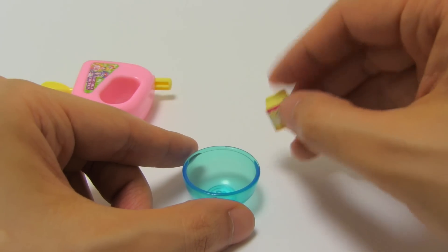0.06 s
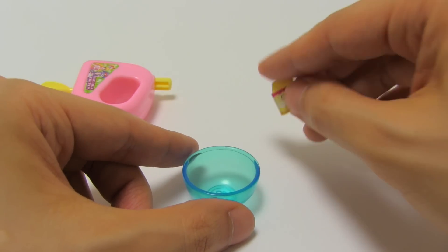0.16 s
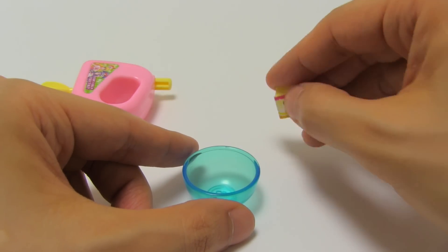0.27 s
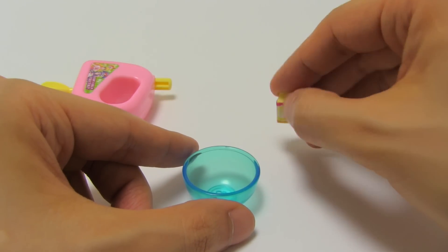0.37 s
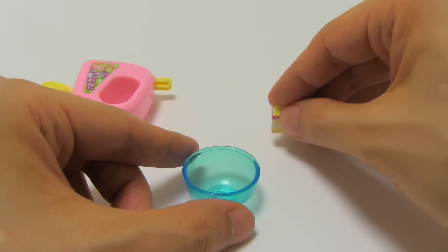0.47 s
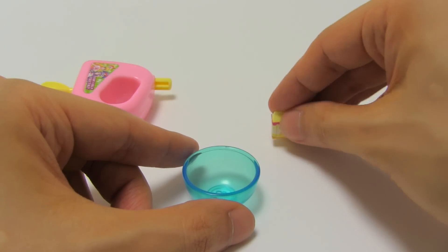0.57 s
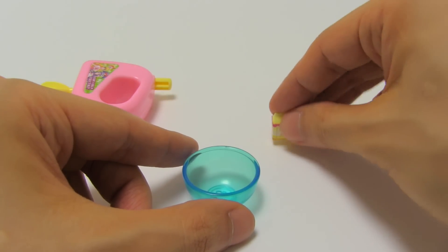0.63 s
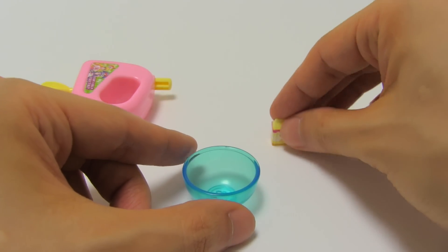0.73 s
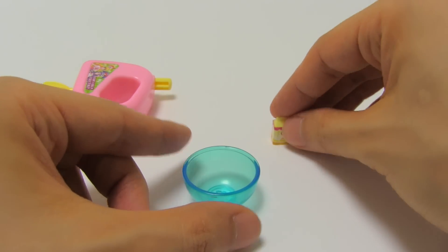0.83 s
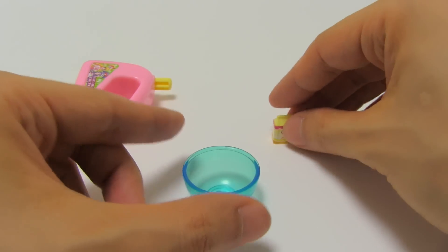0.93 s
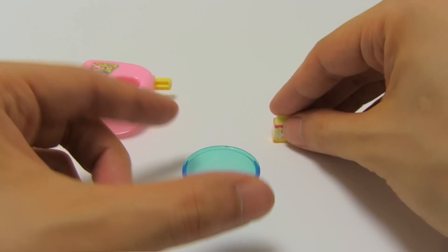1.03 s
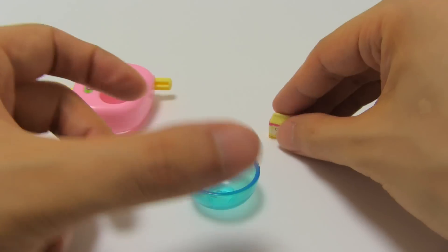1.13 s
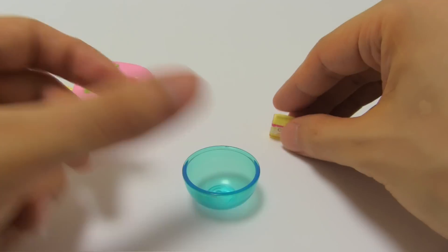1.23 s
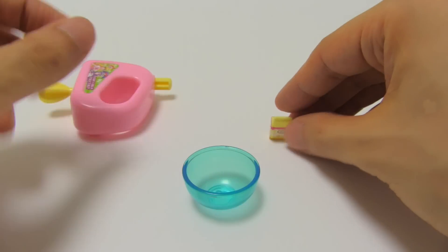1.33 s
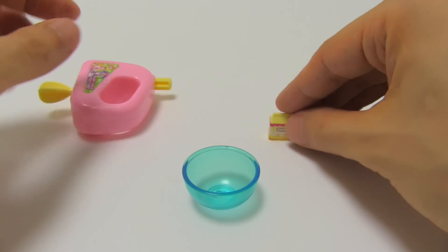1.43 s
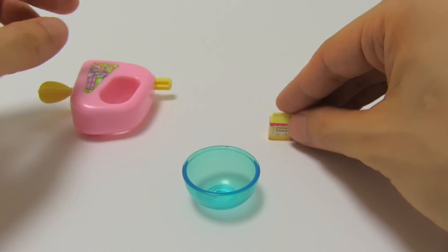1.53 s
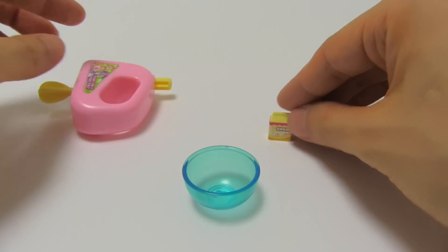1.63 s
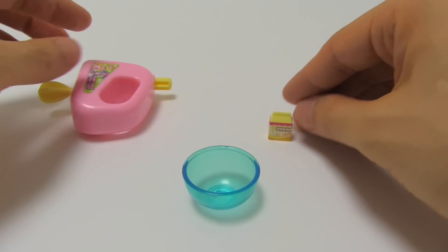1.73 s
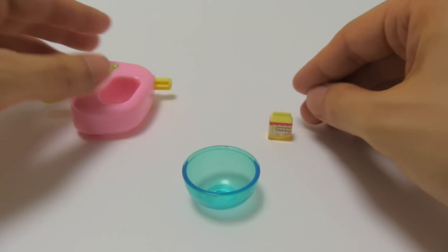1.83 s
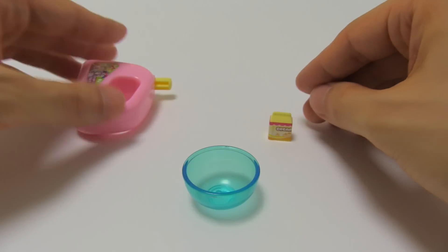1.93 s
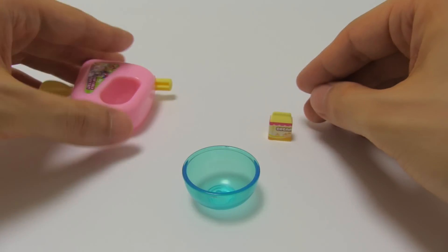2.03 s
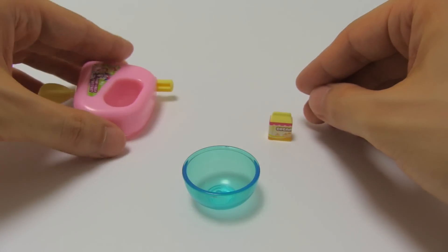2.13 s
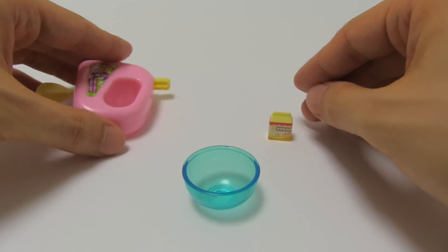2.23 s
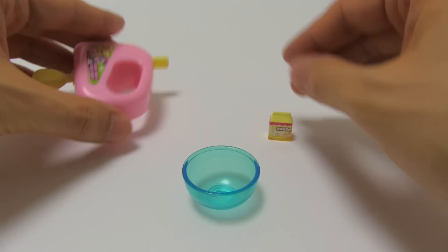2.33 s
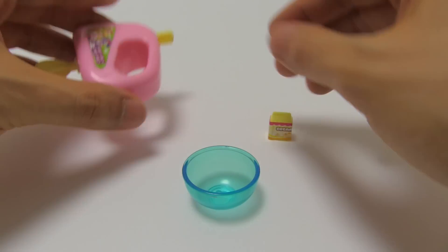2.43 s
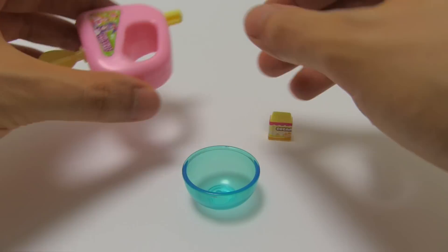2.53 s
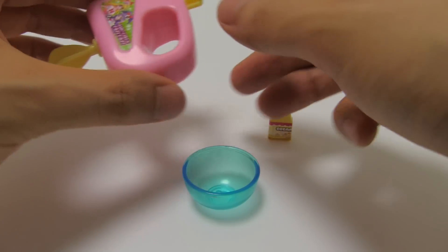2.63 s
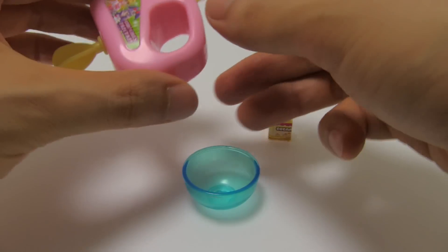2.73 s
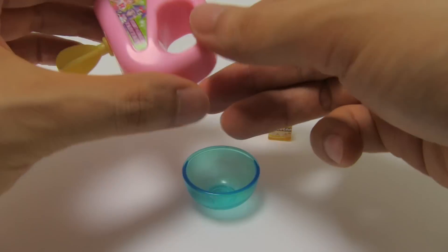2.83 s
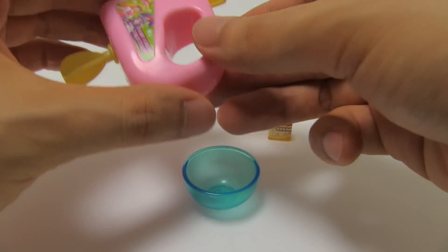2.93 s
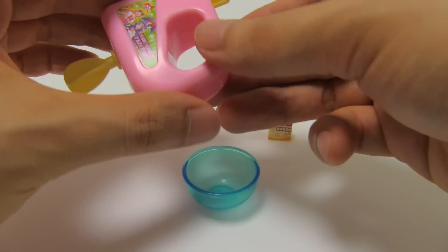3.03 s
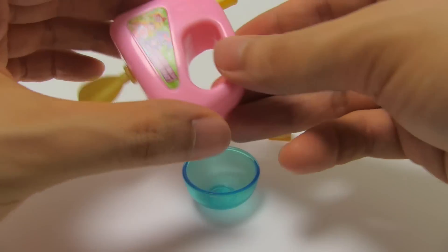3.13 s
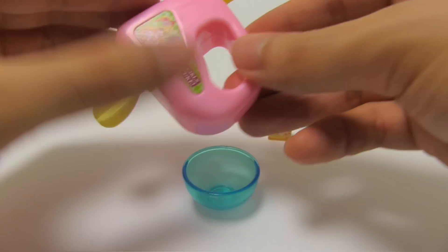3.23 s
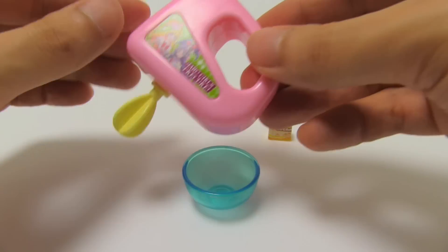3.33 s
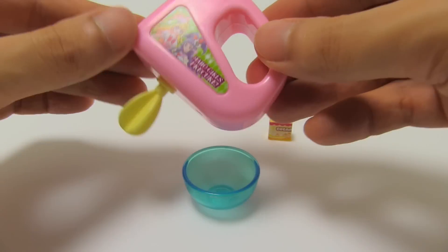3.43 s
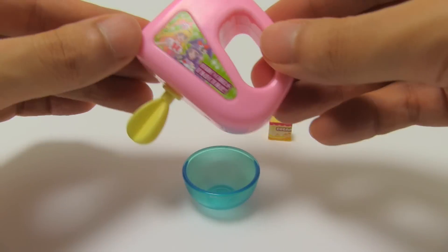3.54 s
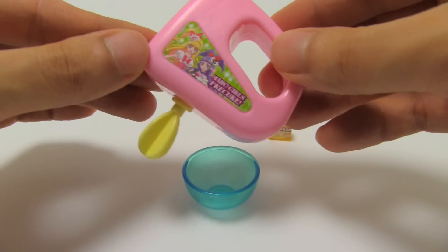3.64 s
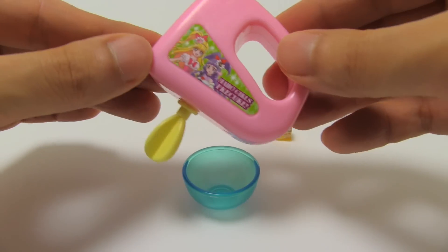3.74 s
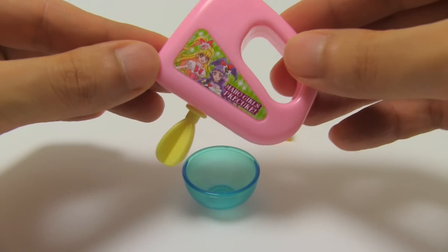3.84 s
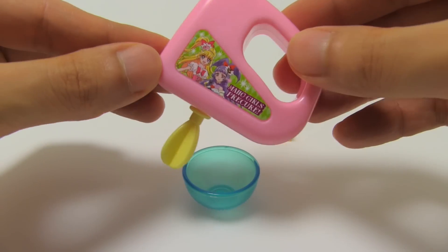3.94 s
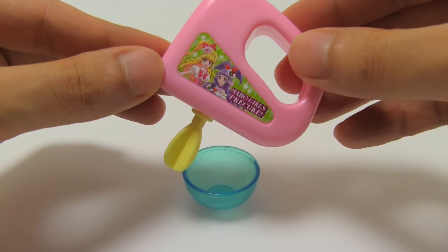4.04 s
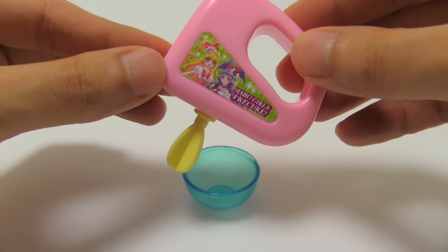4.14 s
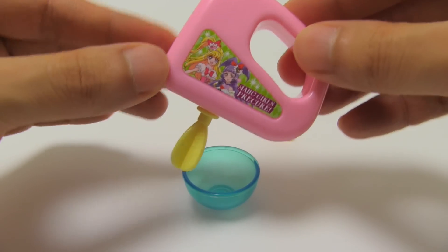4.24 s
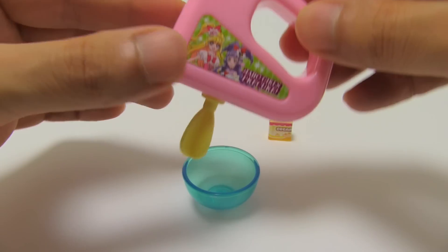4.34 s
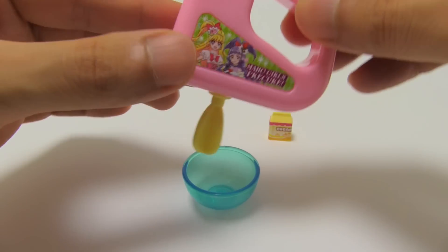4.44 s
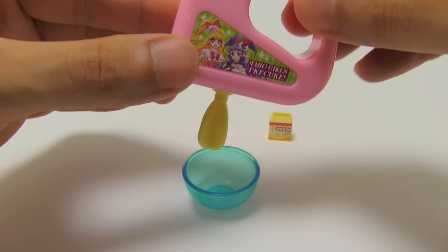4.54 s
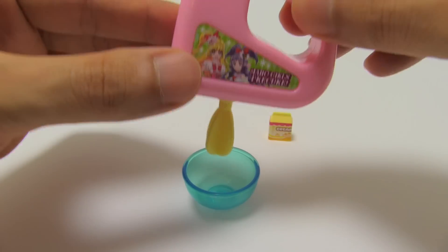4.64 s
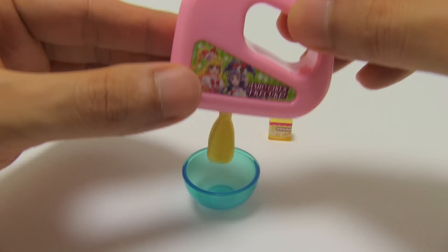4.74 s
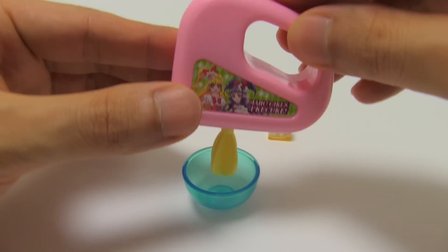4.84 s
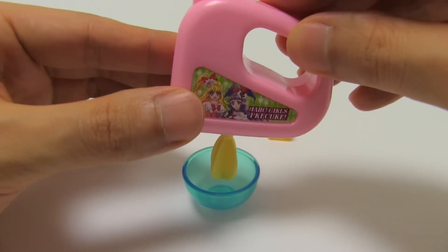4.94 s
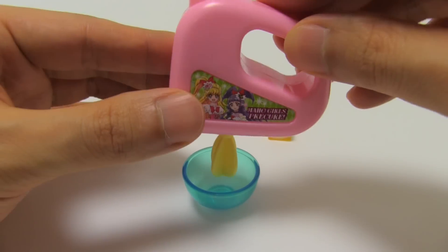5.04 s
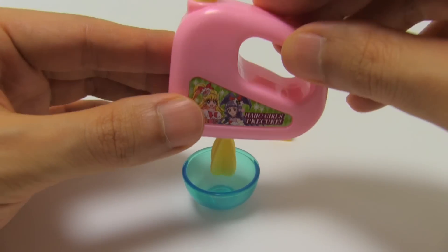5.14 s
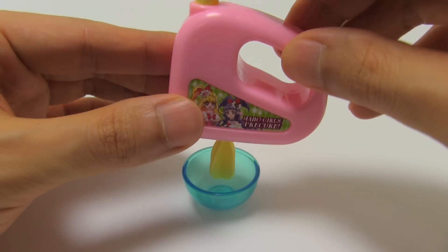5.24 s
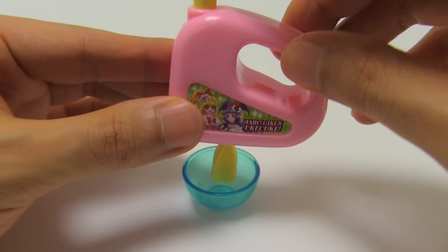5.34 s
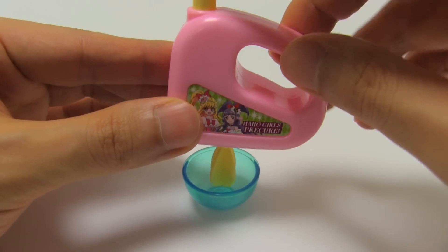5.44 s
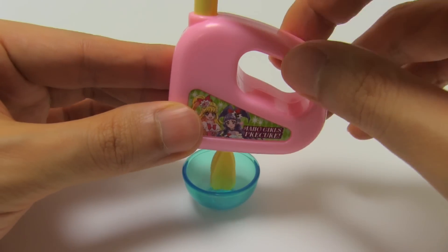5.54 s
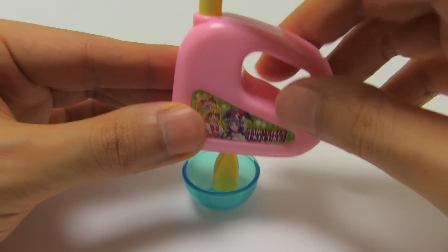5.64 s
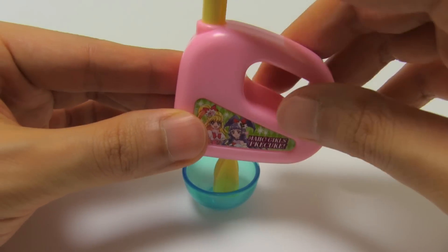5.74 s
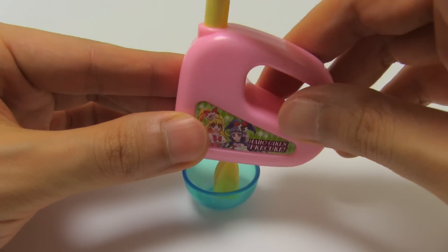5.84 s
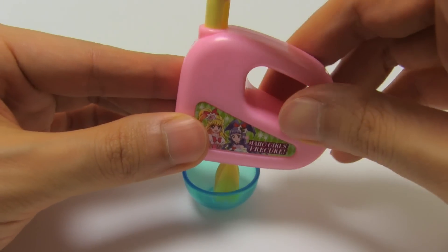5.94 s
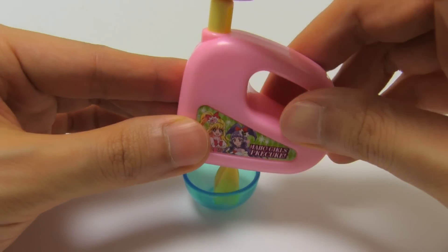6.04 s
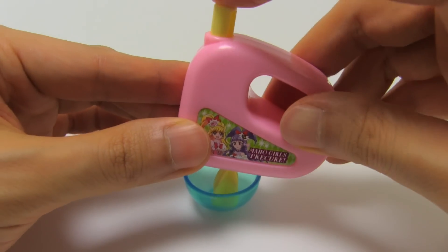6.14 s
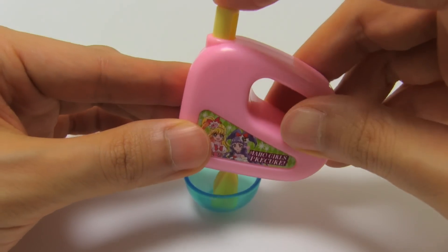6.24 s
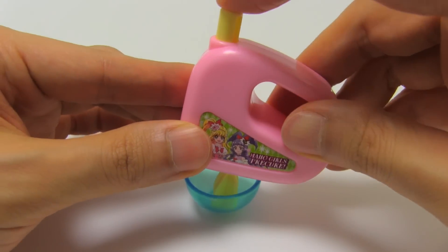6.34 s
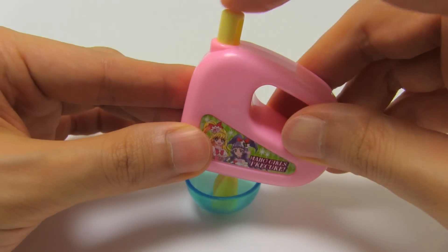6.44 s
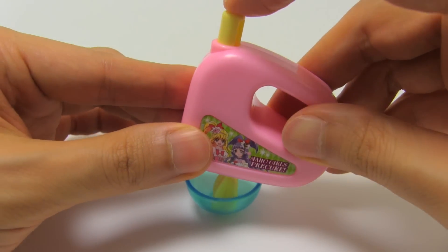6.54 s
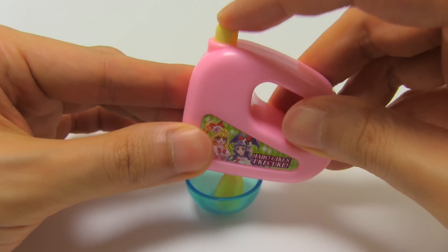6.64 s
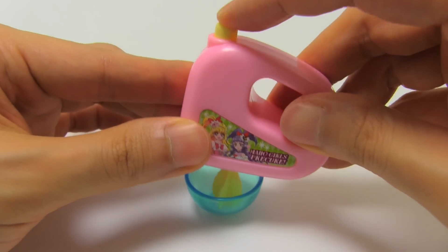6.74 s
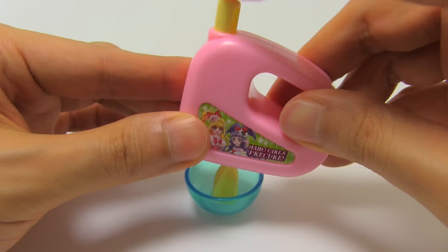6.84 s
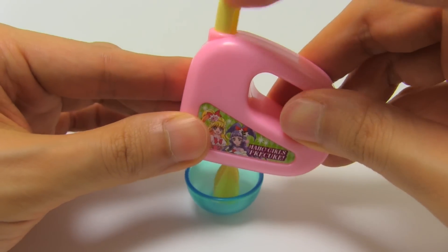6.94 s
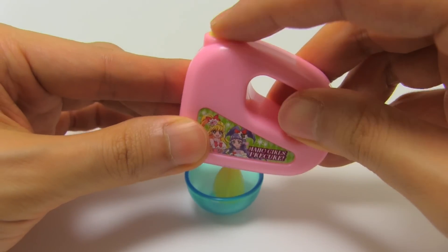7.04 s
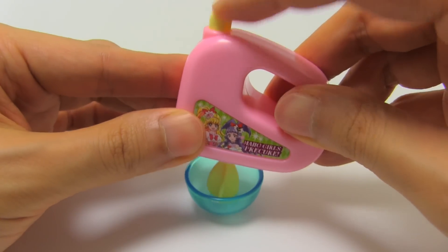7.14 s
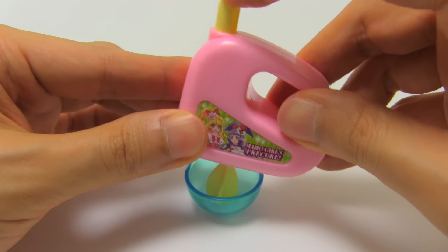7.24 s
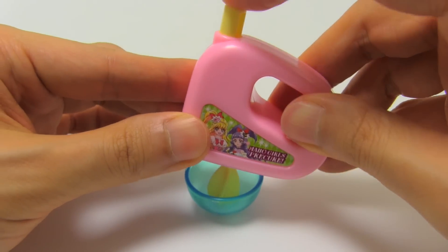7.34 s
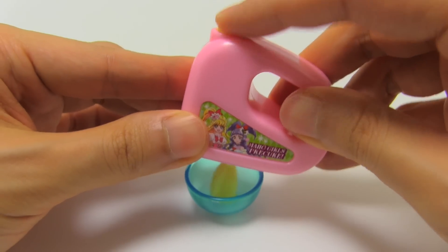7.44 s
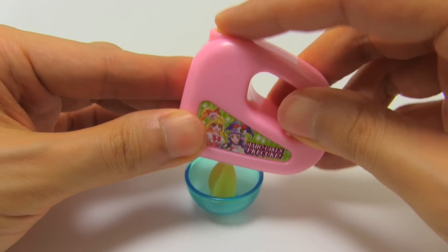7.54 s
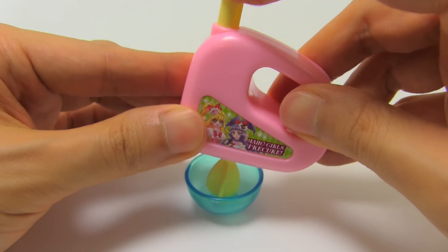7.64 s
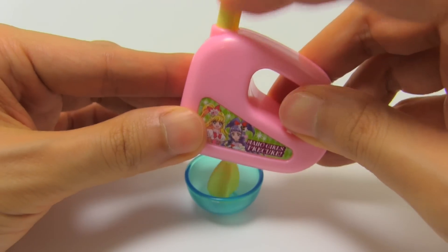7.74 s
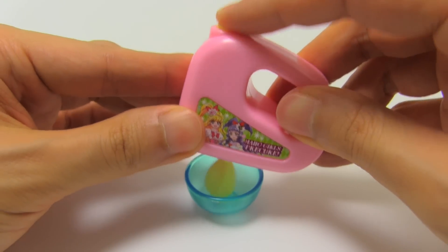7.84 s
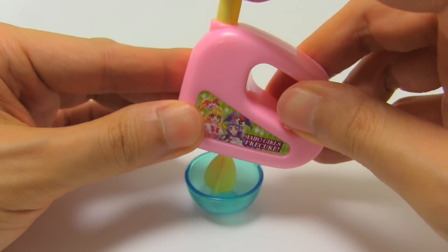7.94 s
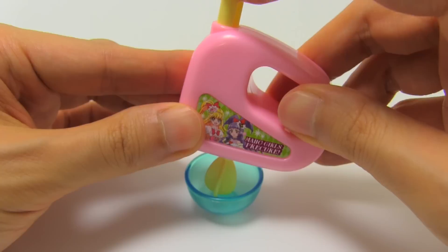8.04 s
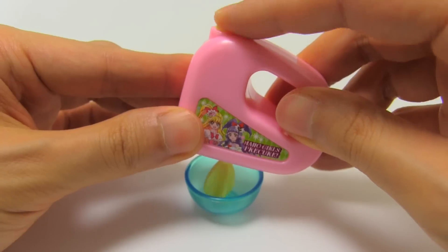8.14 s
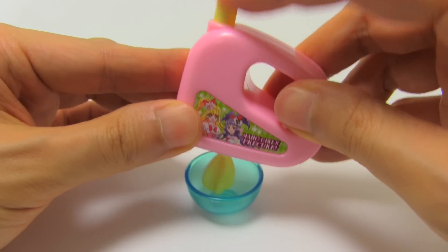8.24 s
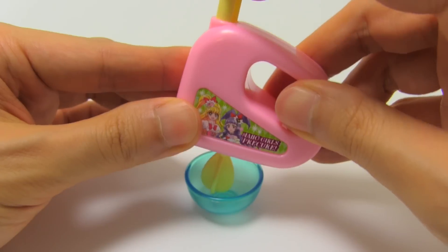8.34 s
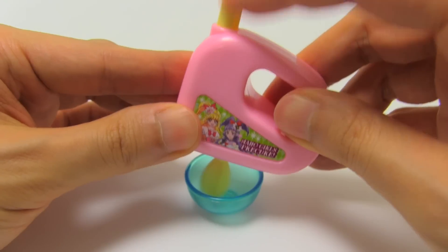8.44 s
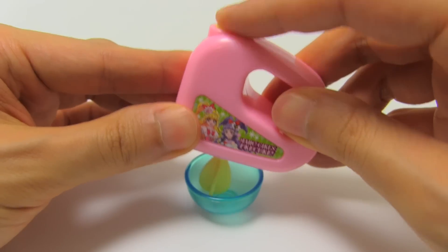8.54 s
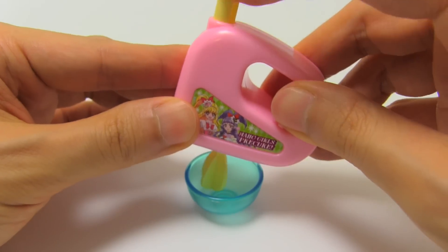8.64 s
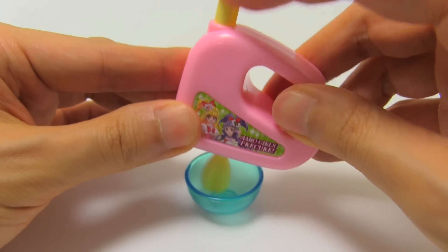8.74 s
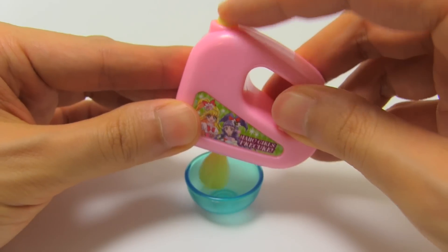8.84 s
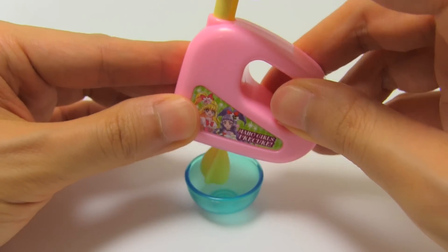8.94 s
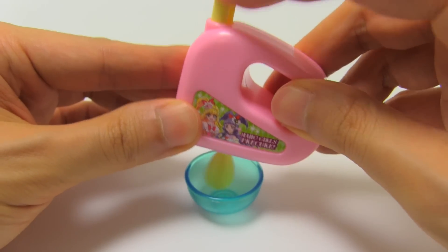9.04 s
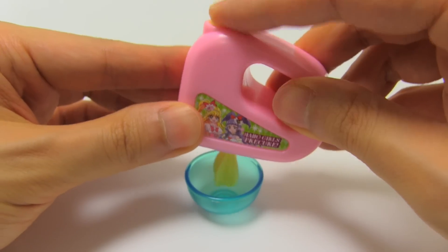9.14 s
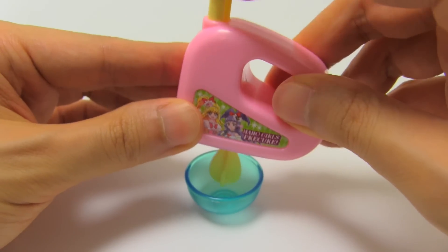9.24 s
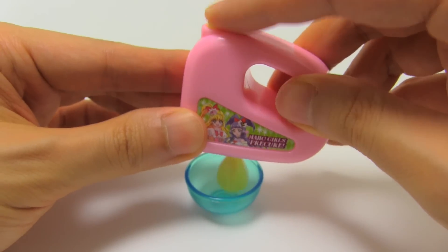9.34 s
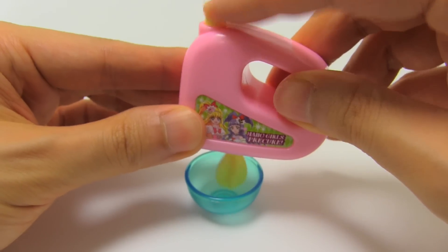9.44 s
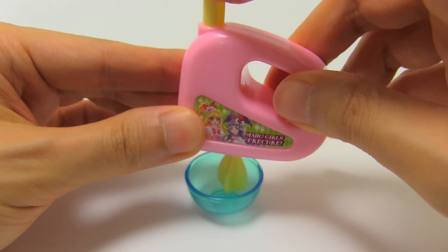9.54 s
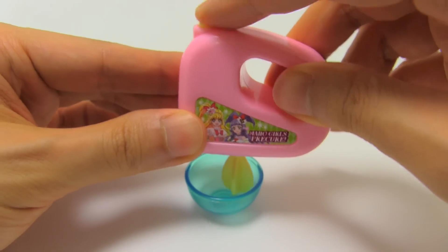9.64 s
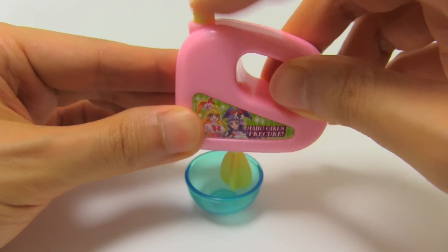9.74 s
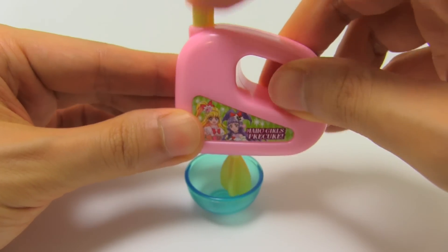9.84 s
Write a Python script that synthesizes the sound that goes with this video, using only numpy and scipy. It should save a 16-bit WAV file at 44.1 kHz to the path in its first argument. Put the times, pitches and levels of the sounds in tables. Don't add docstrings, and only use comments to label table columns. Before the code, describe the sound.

Close to the microphone, sparse clicks and rubs of thin hard plastic and a few dull tabletop knocks come first, over soft fan hum and hiss. Then comes a much louder, dry plastic rattling: quick plunger strokes set loose gears and a beater chattering in short bursts with tiny gaps. Loose parts buzz after each clack and a small room answers briefly.

```python
import sys
import numpy as np
from scipy import signal
from scipy.fft import rfft, irfft
from scipy.io import wavfile
from scipy.ndimage import uniform_filter1d

SR = 44100
rng = np.random.default_rng(int(sys.argv[2]) if len(sys.argv) > 2 else 0)


def wav_record(signal):
    frames = np.transpose(np.atleast_2d(signal))
    bounded = np.clip(frames, -1, 1)
    quanta = np.round(bounded * 32767).astype(np.int16)
    wavfile.write(sys.argv[1], SR, quanta)


def rack_gain(trim_db):
    fader = np.asarray(trim_db, float)
    return 10 ** (fader / 20)


N = 435708
HIT = 2048
HIT_HZ = np.arange(HIT // 2 + 1) * SR / HIT

# center_hz [Hz], width_hz [Hz], level_db [dB]
SHELL_LOW = [(2905, 296, -12), (3700, 190, 0.5), (4246, 290, 1.5), (4717, 270, -3.5), (5307, 450, -7)]
SHELL_MID = [(6360, 262, 2), (7000, 120, 5), (7900, 460, -2.5)]
SHELL_HIGH = [(8840, 550, -9), (9980, 287, -0.5), (11463, 640, -9), (12370, 2000, -11.5), (13620, 840, -12),
              (15000, 1200, -20.5), (10500, 490, -11.5)]
# center_hz [Hz], width_hz [Hz], level_db [dB]
TABLE_TOP = [(680, 375, 5.5), (854, 620, 6), (1540, 1200, 2), (2195, 330, 5.5)]


def along(table, hz):
    points_hz, values = np.transpose(table)
    return np.interp(np.log(hz + 1), np.log(points_hz), values)


def modes(table, hz, detune=1):
    total = 0
    for k, (center_hz, width_hz, level_db) in enumerate(table):
        drive = 1j * hz * width_hz
        resonance = drive / ((center_hz * detune) ** 2 - hz ** 2 + drive)
        total = total + (-1) ** k * rack_gain(level_db) * resonance
    return total


def contact(count, rise_s, fall_s, grit):
    t = np.arange(HIT) / SR
    noise = rng.standard_normal((count, 2, HIT))
    shape = (1 - np.exp(-t / rise_s)) ** 3 * np.exp(-t / fall_s)
    return rfft(shape * noise[:, 0] * np.exp(grit * noise[:, 1]))


def ring(push, response, peak_db):
    y = irfft(push * response, HIT)
    return y / np.abs(y).max(axis=1, keepdims=True) * rack_gain(peak_db)[:, None]


def place(at_s, hits):
    out = np.zeros(N + 2 * HIT)
    crest = uniform_filter1d(hits ** 2, size=40).argmax(axis=1)
    for start, hit in zip((at_s * SR).astype(int) - crest, hits):
        out[start:start + HIT] += hit
    return out[:N]


def air():
    # freq_hz [Hz], level_db [dB per Hz]
    hush_curve = [(15, -64), (25, -31), (70, -6), (114, -9.5), (145, 1), (185, -7.5), (223, 0.5),
                  (463, -10.5), (503, -12), (607, -9.5), (2160, -26.5), (4740, -32.5), (5730, -31.5),
                  (9070, -27), (16000, -39.5)]
    # freq_hz [Hz], side_minus_mid_db [dB]
    side_curve = [(60, -12), (110, -8), (200, -14), (380, -6), (700, -6), (1290, -3.5), (2380, -2.5),
                  (4400, -6), (8120, -9.5), (15000, -6)]
    # center_hz [Hz], width_hz [Hz], level_db [dB]
    hum = [(74, 14, -74), (157, 6.6, -66), (211.5, 3.4, -64.5), (296, 15.4, -60.5), (516, 14.7, -66.5),
           (4540, 600, -73.5), (6500, 210, -76), (8080, 220, -76.5), (9400, 200, -83), (903, 140, -64.5),
           (12300, 64, -81)]
    hz = np.fft.rfftfreq(N, 1 / SR)
    hush = rack_gain(2 * along(hush_curve, hz))
    power = hush / hush.sum() * rack_gain(2 * -52.5)
    for center_hz, width_hz, level_db in hum:
        line = np.exp(-.5 * ((hz - center_hz) / width_hz) ** 2)
        power = power + line / line.sum() * rack_gain(2 * level_db)
    mid, side = rfft(rng.standard_normal((2, N))) * np.sqrt(power * len(hz))
    side = side * rack_gain(along(side_curve, hz))
    return irfft(np.array([mid + side, mid - side]), N)


def taps():
    # at_s [s], peak_db [dB], ring_hz [Hz], crack_db [dB re ring]
    rubs = [
        (0.6535, -50, 3210, -45),
        (0.6794, -50, 4400, -47),
        (1.053, -47, 3560, -38),
        (1.0767, -39.5, 3470, -37),
        (1.097, -45, 4410, -44),
        (1.2344, -50, 3100, -48),
        (1.2644, -51, 3600, -49),
        (2.448, -38.5, 5050, -37),
        (3.3567, -33.5, 4270, -27),
        (5.248, -47, 3270, -48),
    ]
    # at_s [s], peak_db [dB], ring_hz [Hz], crack_db [dB re ring], contact_ms [ms]
    rings = [(1.188, -38, 3850, -37, 4), (2.1143, -26, 3970, -15, 2.1), (2.145, -38, 3770, -42, 2.8),
             (2.207, -35, 3970, -39, 1.6), (2.283, -29, 3950, -11, 2.2), (2.293, -32, 4100, -12, 4),
             (2.3153, -26.5, 4260, -5, 5), (2.4044, -46, 4440, -38, 1.7), (3.367, -35, 4230, -27, 4.4),
             (4.8894, -22.5, 5000, -19, 1.6), (5.2, -43.5, 4400, -40, 2.7), (5.4313, -39, 5070, -34, 2.5),
             (5.438, -24.5, 5060, -29, 1.6), (5.5344, -49, 4950, -30, 1.5), (5.6281, -27, 4400, -1.5, 2.05),
             (5.721, -24.5, 4500, 1, 1.85), (6.0037, -35, 3900, -44, 2), (6.196, -44, 4180, -43, 2),
             (6.3957, -44, 3760, -48, 1.3), (6.476, -40.5, 4140, -40, 1.5)]
    # at_s [s], peak_db [dB], ring_hz [Hz], crack_db [dB re ring], contact_ms [ms]
    clicks = [(0.7574, -29, 3340, -38, 2.2), (1.0794, -38, 6340, -32, 2.1), (1.2055, -30, 3470, -35, 4.9),
              (1.3456, -18.5, 3600, -8, 1.4), (1.4384, -36, 3450, -48, 1.3), (1.615, -33.5, 3180, -18, 1.3),
              (2.135, -37, 6000, -20, 4.6), (2.2007, -37, 6000, -20, 2.2), (2.383, -31, 4870, -21, 2.2),
              (3.1164, -47, 4500, -46, 1.6), (3.3407, -32, 6500, -27, 2.7), (4.634, -37, 5360, -35, 2.1),
              (4.7094, -48, 6550, -34, 1.7), (4.751, -26.5, 5100, -21, 1.14), (5.557, -32.5, 4700, -11, 3),
              (5.829, -20, 5600, -10, 2.5), (5.9858, -34.5, 5600, -32, 2.4), (6.514, -34, 3000, -30, 0.98),
              (6.5913, -31, 2500, -30, 1.2)]
    rows = [[*r, .28] for r in rings] + [[*r, .79] for r in clicks] + [[*r, 9, 1] for r in rubs]
    at_s, peak_db, ring_hz, crack_db, contact_ms, share = np.transpose(rows)
    fall_s = contact_ms[:, None] / 1000
    push = contact(len(at_s), rise_s=0.071 * fall_s, fall_s=fall_s, grit=0.46)
    dull = modes([(ring_hz[:, None], (share * ring_hz)[:, None], 0)], HIT_HZ) ** 2
    body = dull + rack_gain(-23) * modes(TABLE_TOP, HIT_HZ)
    shell = modes(SHELL_MID, HIT_HZ) + modes(SHELL_HIGH, HIT_HZ) + 1
    crack = shell * modes([(8600, 4200, 0)], HIT_HZ) ** 2
    tick = place(at_s, ring(push, body, peak_db) + ring(push, crack, peak_db + crack_db))
    return tick * rack_gain(np.array([[.8], [-.8]]))


def thuds():
    # at_s [s], peak_db [dB], ring_hz [Hz], t60_s [s], overtones_db [dB]
    knocks = [
        (0.757, -34.5, 370, 0.044, -8),
        (0.926, -35.5, 368, 0.039, -12),
        (1.206, -29, 770, 0.022, -8),
        (1.345, -21.5, 366, 0.024, 1),
        (1.614, -32, 382, 0.03, -3),
        (2.106, -29.5, 354, 0.038, -26),
        (2.273, -24.5, 353, 0.031, -9),
        (3.359, -44, 287, 0.1, 6),
    ]
    at_s, peak_db, ring_hz, t60_s, over_db = np.transpose(knocks)[:, :, None]
    width_hz = np.log(1000) / np.pi / t60_s
    body = modes([(ring_hz, width_hz, 0),
                  (2.39 * ring_hz, 1.3 * width_hz, over_db),
                  (4.7 * ring_hz, 21.0 * width_hz, over_db - 12.5)], HIT_HZ)
    push = np.exp(-(HIT_HZ / 2500) ** 2 - 2j * np.pi * HIT_HZ * .001)
    return place(at_s[:, 0] + 0.00209, ring(push, body, peak_db[:, 0]))


def room(x, count=4):
    # freq_hz [Hz], t60_s [s]
    decay = [(300, 0.36), (2000, 0.38), (5000, 0.34), (10000, 0.21), (16000, 0.046)]
    level_db, side_db = -14, -7.5
    size = SR // 2
    t = np.arange(size) / SR
    tails = np.zeros((count, 2, size))
    for hz in 250 * 2 ** np.arange(0, 6.1, .5):
        edges_hz = [hz / 2 ** .25, min(hz * 2 ** .25, .49 * SR)]
        band = signal.butter(2, edges_hz, "band", fs=SR, output="sos")
        noise = signal.sosfilt(band, rng.standard_normal(tails.shape))
        width = np.array([[1], [min(1, 2500 / hz) ** 0.37]])
        tails = tails + width * noise * rack_gain(-60 * t / along(decay, hz))
    tails = tails * np.clip(t / 0.0023, 0, 1) / np.sqrt(np.sum(tails[:, 0] ** 2) / count)
    position = np.arange(N) / SR * 25
    echoes = np.zeros((2, N))
    for k in range(count):
        share = np.clip(1 - abs((position - k) % count - 1), 0, 1)
        echoes += signal.fftconvolve((x * share)[None], tails[k], axes=1)[:, :N]
    mid, side = echoes
    return rack_gain(level_db) * (mid + rack_gain(side_db) * side * np.array([[1], [-1]]))


def gears(count=14):
    # start_s [s], stop_s [s], blow_db [dB peak], first_blow_s [s], first_turn_ms [ms]
    strokes = [(6.653, 6.705, -15.5, 6.6676, 18), (6.8125, 6.863, -10, 6.8101, 20),
               (6.995, 7.068, -10, 7.0241, 11), (7.1656, 7.258, -12, 7.1854, 20),
               (7.413, 7.484, -8.5, 7.4248, 18.5), (7.5892, 7.652, -9, 7.5917, 16),
               (7.7782, 7.823, -8.5, 7.7866, 17.5), (7.9255, 7.978, -13, 7.942, 15),
               (8.1183, 8.17, -4, 8.127, 12), (8.2493, 8.316, -9.5, 8.258, 15),
               (8.4828, 8.516, -9, 8.4955, 12.5), (8.6203, 8.694, -8, 8.6406, 18),
               (8.7766, 8.817, -10, 8.7798, 16), (8.9055, 8.953, -6, 8.9262, 14.7),
               (9.086, 9.13, -8.5, 9.0945, 14), (9.2083, 9.261, -11.5, 9.2185, 9),
               (9.2722, 9.292, -18, 9.2777, 8.5), (9.3557, 9.399, -7, 9.367, 16),
               (9.4837, 9.526, -11, 9.4995, 8), (9.658, 9.682, -9, 9.6684, 30),
               (9.7913, 9.84, -10, 9.7982, 16)]
    # [dB, upper rings re low]
    slams = [(6.6667, -8.5, 2), (6.8275, -10, 6), (7.0191, -12, 9.5), (7.1897, -11, 3.5), (7.4253, -6.5, 1),
             (7.611, -7, 6), (7.805, -7.5, 7.5), (7.9405, -5, 4.5), (8.1553, -11.5, 6.5),
             (8.2964, -10, 7.5), (8.5018, -7, 5.5), (8.6725, -12, -1), (8.7959, -5.5, -0.5),
             (8.9264, -5, 1), (9.085, -7, 6), (9.2272, -7, 5), (9.278, -11.5, 2), (9.3715, -3.5, 2.5),
             (9.5075, -3.5, -2.5), (9.6644, -8, 0), (9.7927, -9, -2)]
    # [dB, upper rings re low]
    strays = [(6.592, -26, -7.5), (6.6295, -26, -3), (6.7288, -21.5, -3), (6.983, -33.5, -5.5),
              (7.0804, -17, 3), (7.1147, -24.5, 1), (7.6775, -26, -5), (7.711, -28.5, -1),
              (7.7667, -23, -4), (7.8449, -12.5, -1.5), (7.9095, -22.5, 1), (7.9968, -19.5, 2.5),
              (8.1965, -16, -2), (8.4703, -21, 6), (8.2275, -32, 0.5), (8.526, -19, -1.5),
              (8.5412, -25.5, 11), (8.839, -18, 1), (8.9729, -19.5, 3), (8.991, -18, -3),
              (7.2513, -7, -8.5), (9.0493, -23, -2), (9.0604, -28, 12), (9.3402, -17.5, -1),
              (9.4083, -15, 5.5), (9.578, -20, -5), (9.6192, -33, -12), (9.6332, -11, -4.5),
              (9.6502, -13, -4), (9.7734, -8, -11)]
    yield_s = 0.0023
    start_s, stop_s, stroke_db, first_s, turn_ms = np.transpose(strokes)[:, :, None]
    slam_s, _, grip_db = np.transpose(slams)[:, :, None]
    draw = rng.standard_normal((len(start_s), 5, count)).clip(-2, 1.5)

    turns_s = 1.07 ** np.arange(count // 2) * turn_ms / 1000
    blows_s = first_s + np.cumsum(turns_s, axis=1) - turns_s
    blow_db = stroke_db + 2 * draw[:, 1, ::2]

    gaps_s = 0.0057 * np.exp(.3 * draw[:, 0])
    teeth_s = start_s + np.cumsum(gaps_s, axis=1) - gaps_s[:, :1]
    spin_up_db = -2.5 * np.exp(-(teeth_s - start_s) / 0.0049)
    tooth_db = stroke_db - 7 + 3.5 * draw[:, 2] + spin_up_db
    near_blow = np.exp(-((teeth_s[:, :, None] - blows_s[:, None]) / yield_s) ** 2)
    tooth_db = tooth_db - 10 * near_blow.sum(axis=2)

    at_s = np.hstack([blows_s, teeth_s])
    peak_db = np.hstack([blow_db, tooth_db])
    from_slam_s = at_s - slam_s
    peak_db = peak_db - 75 * abs(from_slam_s)
    peak_db = peak_db - 20 * np.exp(-(from_slam_s / yield_s) ** 2)
    peak_db = np.where(at_s <= stop_s, peak_db, -200)
    scatter_db = 4 * np.hstack([0.58 * draw[:, 3, ::2], draw[:, 4]])
    bright_db = 1 + .4 * grip_db + scatter_db
    flurry = [np.minimum(at_s, stop_s).ravel(), peak_db.ravel(), bright_db.ravel()]
    return np.hstack([flurry, np.transpose(slams), np.transpose(strays)])


def clacks():
    at_s, peak_db, bright_db = gears()
    spot = rng.standard_normal((len(at_s), 5))
    detune = 1 + .035 * spot[:, :3]
    fall_s = 0.00097 * rack_gain(3.0 * spot[:, 3:4])
    push = contact(len(at_s), rise_s=.0014, fall_s=fall_s, grit=0.62)
    low = modes(SHELL_LOW, HIT_HZ, detune[:, :1])
    high = rack_gain(2.2 * spot[:, 4:]) * modes(SHELL_HIGH, HIT_HZ, detune[:, 2:])
    upper = modes(SHELL_MID, HIT_HZ, detune[:, 1:2]) + high
    hits = ring(push, low, peak_db - .8)
    hits = hits + ring(push, upper, peak_db + bright_db + 0.42)
    hits = hits + ring(push, modes(TABLE_TOP, HIT_HZ), peak_db - 25)
    return place(at_s, hits)


def tremble(clack):
    hold = np.exp(-1 / (0.0068 * SR))
    power = uniform_filter1d(clack ** 2, size=500).clip(0)
    shaken = np.sqrt(signal.lfilter([1 - hold], [1, -hold], power))
    draw = rng.random((2, N))
    tick_db = np.minimum(-3.0 * np.log(draw[1] + 1e-9), 9)
    ticks = (draw[0] < 2500 / SR) * rack_gain(tick_db) * rng.standard_normal(N)
    hz = np.fft.rfftfreq(N, 1 / SR)
    body = modes(SHELL_LOW, hz) - rack_gain(-7) * modes(SHELL_MID, hz) - rack_gain(-5.5) * modes(SHELL_HIGH, hz)
    body = body + rack_gain(-16.5) * modes(TABLE_TOP, hz)
    steady_rms = irfft(rfft(ticks) * body, N).std()
    rattle = irfft(rfft(ticks * shaken) * body, N) / steady_rms * rack_gain(-7.5)
    return rattle * (np.arange(N) > SR)


def scene():
    clack = clacks()
    toy = clack + tremble(clack)
    hands, knocks = taps(), thuds()
    echoes = room(toy + hands.mean(axis=0) + rack_gain(9) * knocks)
    return toy + hands + knocks + echoes + air() * rack_gain(np.array([[.25], [-.25]]))


def top_cut(x):
    return signal.sosfilt(signal.butter(12, 16660, fs=SR, output="sos"), x)


def record(dry):
    rounded = dry / (1 + dry ** 8) ** (1 / 8)
    passed = np.fft.rfftfreq(N, 1 / SR) < 15850
    mix = irfft(rfft(rounded) * passed, N)
    return top_cut(mix)


dry = scene()
out = record(dry)
wav_record(out)
```